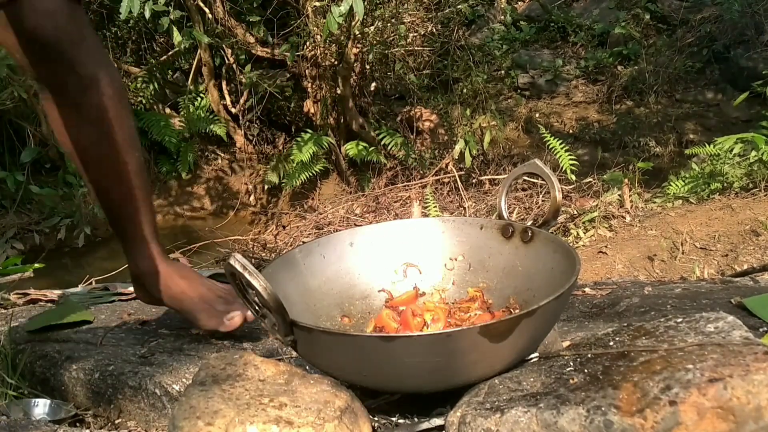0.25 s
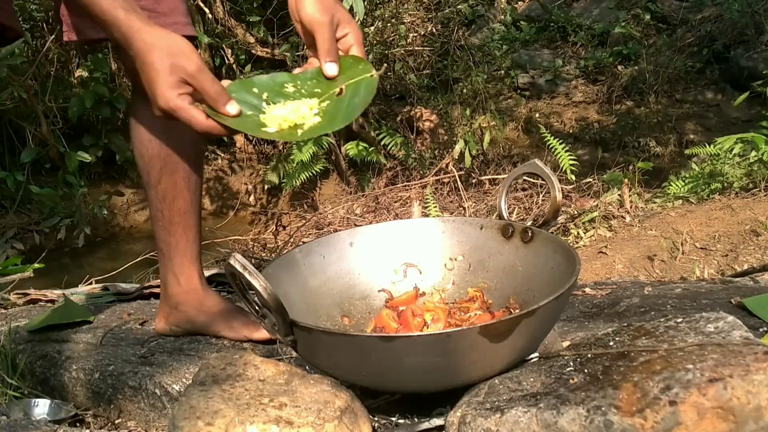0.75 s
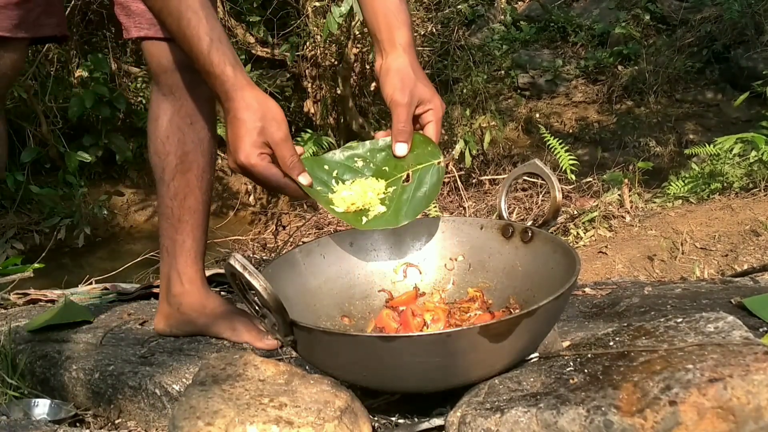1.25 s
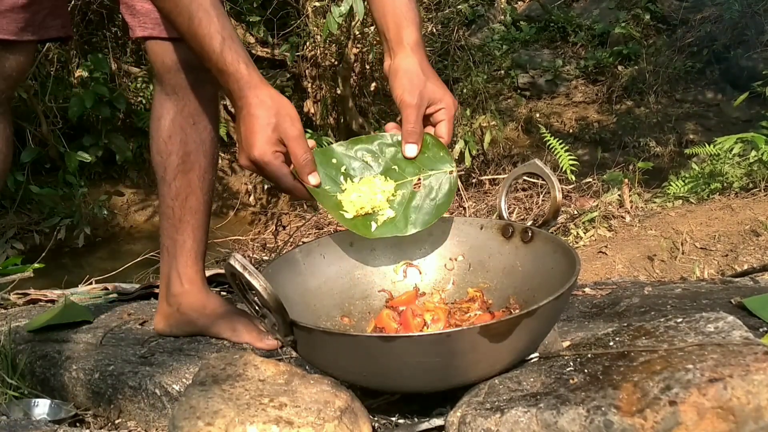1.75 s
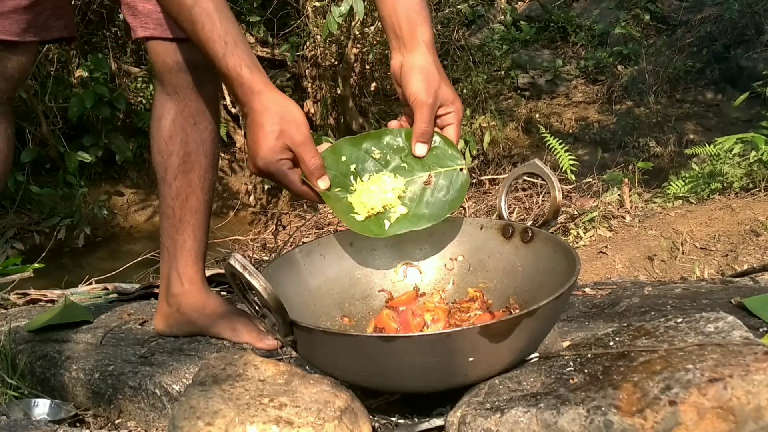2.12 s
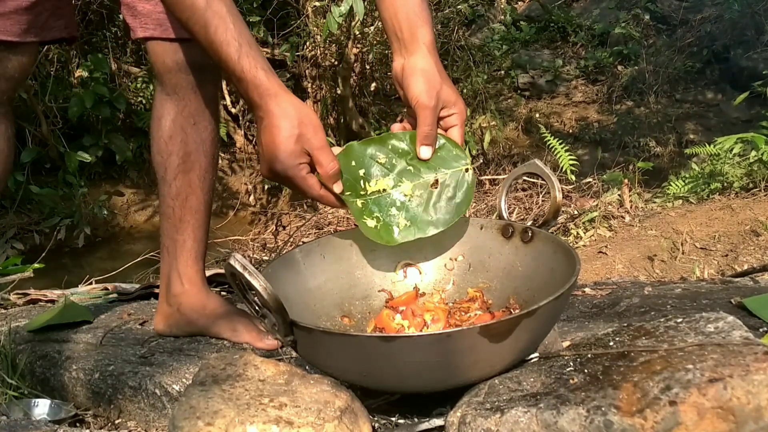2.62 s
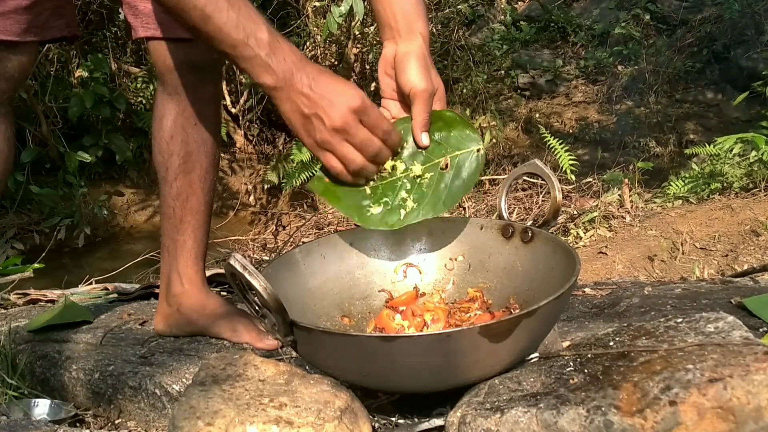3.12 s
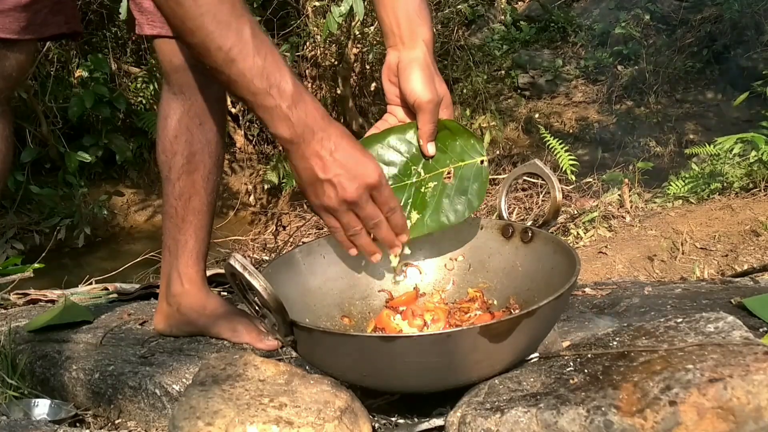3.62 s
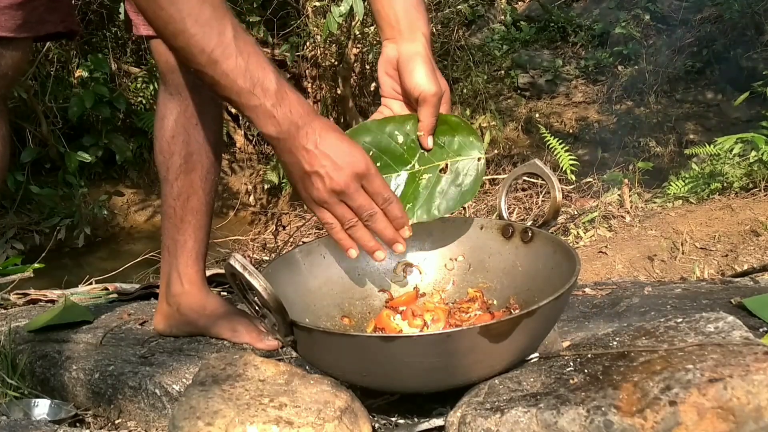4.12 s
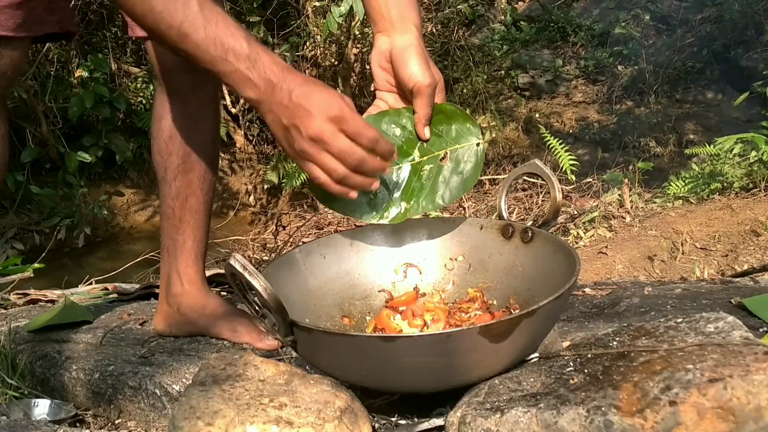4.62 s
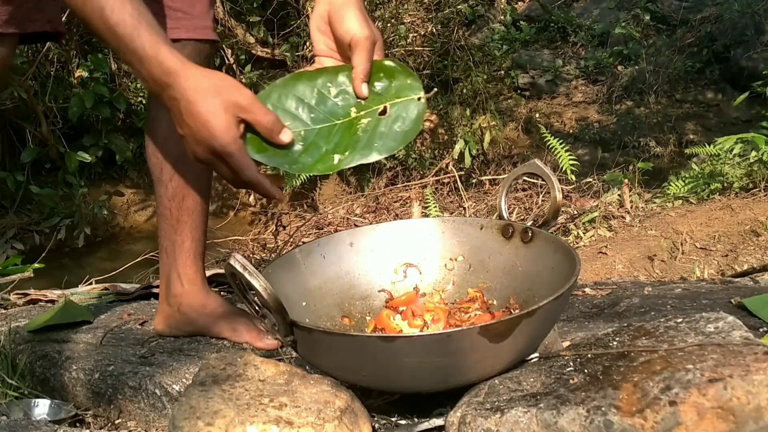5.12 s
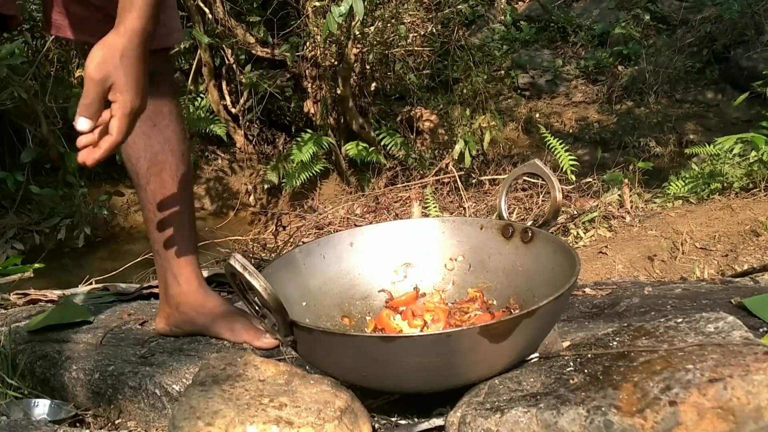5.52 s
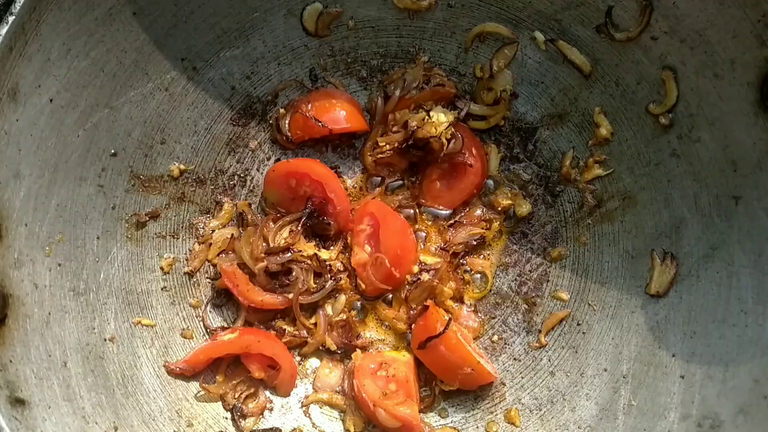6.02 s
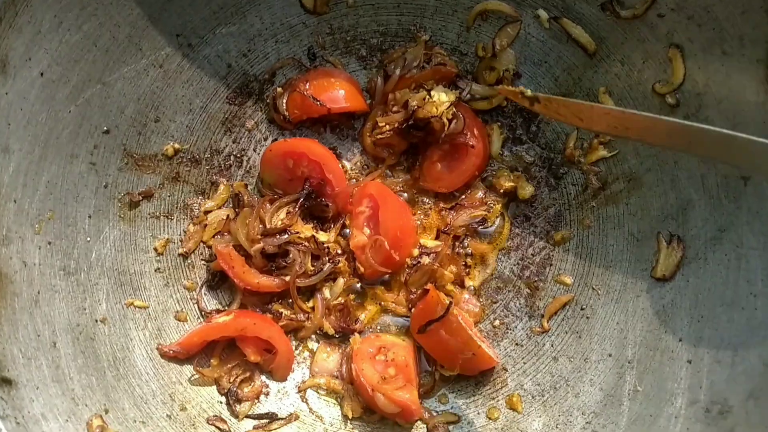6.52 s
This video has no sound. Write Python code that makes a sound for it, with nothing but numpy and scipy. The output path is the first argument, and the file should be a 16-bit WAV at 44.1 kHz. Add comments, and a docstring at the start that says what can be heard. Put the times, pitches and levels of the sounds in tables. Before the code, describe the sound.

Thin, soft frying in the open air with no room echo, heard near for a moment and then from farther off. Small pops and faint twig cracks come first, then a run of dry finger flicks on a leaf, a bright oil snap and a burst of crisp cracks underfoot. At the end, close sizzle swells abruptly with a scraping blade and large drops crackling strongly to the right.

```python
"""Onion and tomato fry in oil in a round metal pan outdoors, heard fairly near, farther off, then over the food.
The sizzle is tiny noise grains over hiss; fat bubbles ring the hollow of the pan, and large drops spit.
Fingers flick garlic off a stiff leaf (strokes of grains, taps of dying noise), twigs snap under a foot
(broad noise puffs), and a knife scrapes the pan (dense grains) as the close sizzle comes in."""
import sys
import numpy as np
from scipy import signal
from scipy.fft import rfft, irfft
from scipy.io import wavfile
from scipy.ndimage import uniform_filter1d

SR = 44100
rng = np.random.default_rng(int(sys.argv[2]) if len(sys.argv) > 2 else 0)


def inscribe(sig):
    """Save sig as 16-bit PCM at rate SR to the path in sys.argv[1].

    A 1-D sig is mono; a 2-D sig holds one channel per row.
    Samples are clipped to [-1, 1] before scaling.
    """
    pcm = np.round(np.clip(np.atleast_2d(sig).T, -1, 1) * 32767)
    wavfile.write(sys.argv[1], SR, pcm.astype(np.int16))


N = 297675

# loudness of the sizzle heard from farther off, which the bubbles follow too: [t/s, level/dB]
FAR_LEVEL = [(0.47, -58), (0.9, -60), (1.9, -62), (2.5, -61), (4.8, -60.5), (5.98, -60), (6.2, -64)]


def amp(db):
    """Turns decibels into a gain."""
    return 10 ** (np.asarray(db) / 20)


def evened(x):
    """Scales a sound to an average (rms) strength of 1."""
    return x / np.sqrt(np.mean(x ** 2) + 1e-20)


def read(points, hz):
    """Reads a table between its rows, with pitch on a log scale."""
    f, value = np.transpose(points)
    return np.interp(np.log(hz + 1), np.log(f + 1), value)


def add(mix, start_s, sound):
    """Adds a stereo sound to the mix from a given second, cut at the end of the mix."""
    part = mix[:, round(start_s * SR):][:, :sound.shape[1]]
    part += sound[:, :part.shape[1]]


def sides(balance_db):
    """Left and right gains that differ by balance_db (left minus right)."""
    return amp(np.array([balance_db / 2, -balance_db / 2]))


def pair(hz, own, shared, extra):
    """Left and right spectra: partly the same noise, as one source reaches both microphones."""
    # how alike left and right are, before extra is added: [f/Hz, likeness/0 to 1]
    likeness = [(30, .3), (70, 0.65), (130, 0.9), (290, 0.96), (640, 0.85), (1100, 0.55), (1800, 0.62),
                (3100, 0.16), (6800, 0.08), (15000, 0.21)]
    # how far the left microphone leads in phase: [f/Hz, lead/rad]
    left_lead = [(300, 0.16), (1000, 0.83), (1400, 1.02), (1800, 2), (2400, 1.2)]
    same = np.clip(read(likeness, hz) + extra, 0, 1)
    turned = np.exp(1j * read(left_lead, hz)) * shared
    left = same * turned + np.sqrt(1 - same ** 2) * own
    return np.array([left, shared])


def grains(length, per_s, spread_db, grain_s):
    """Random clicks, mostly small, a few large, each open a dying puff of noise with its own colour."""
    size = amp(spread_db * np.minimum(rng.exponential(1, (2, length)), 5))
    clicks = size * (rng.random((2, length)) < per_s / SR)
    dying = np.exp(-1 / (grain_s * SR))
    envelope = signal.lfilter([1], [1, -dying], clicks)
    return evened(envelope * rng.standard_normal((2, length)))


def texture(rows, colour, balance, per_s, spread_db, grain_s, hiss, patchy_db):
    """Grains over hiss, with drifting patches of pitch, under a level curve; hiss is its share of power."""
    s, level_db = np.transpose(rows)
    t = np.arange(s[0], s[-1], 1 / SR)
    length = len(t) + 1024
    drive = np.sqrt(1 - hiss) * grains(length, per_s, spread_db, grain_s)
    drive += np.sqrt(hiss) * rng.standard_normal((2, length))
    hz, _, (own, shared) = signal.stft(drive, SR, nperseg=1024, noverlap=768)

    # smoothing over pitch, then over time, makes the patches
    patches = uniform_filter1d(rng.standard_normal(own.shape), size=12, axis=0)
    patches = evened(uniform_filter1d(patches, size=6, axis=1))
    z = pair(hz[:, None], own, shared, extra=0)
    z = z * sides(read(balance, hz))[:, :, None]
    z = z * amp(read(colour, hz)[:, None] + patchy_db * patches)
    out = signal.istft(z, SR, nperseg=1024, noverlap=768)[1][:, 512:512 + len(t)]

    # 8 ms fades, unless the sound touches the start or end of the scene
    touches = (s[0] == 0) + (s[-1] > N / SR - .01)
    fade = np.minimum(1, np.minimum(t - s[0], s[-1] - t) / .008 + touches)
    middle_rms = np.sqrt(np.mean(out.mean(0) ** 2))
    return s[0], out / middle_rms * amp(np.interp(t, s, level_db)) * fade


def burst(hz, gain, t60, rise_s, balance_db):
    """A blow's dying puff of noise with the spectrum gain; t60 is the time to die by 60 dB."""
    t = np.arange(4096) / SR
    z = rfft(rng.standard_normal((2, 4096)))
    # single events are more alike left and right
    puff = irfft(pair(hz, z[0], z[1], extra=0.14) * gain)
    shape = amp(-60 * t / t60) * (1 - np.exp(-t / rise_s))
    # the first instant of a blow stands out over its ring
    spike, spike_s = 2, 0.0011
    shape *= 1 + spike * np.exp(-t / (spike_s + rise_s))
    puff = puff * shape
    return puff / abs(puff).max(1)[:, None] * sides(balance_db)[:, None]


def knocks(mix, rows, width, t60, damping):
    """Puffs around each pitch: low ones swell and die more slowly; width is a share of the pitch."""
    # which side a knock leans to: [f/Hz, left minus right/dB]
    knock_balance = [(300, -4.5), (1500, -7), (6500, -10.5)]
    hz = np.fft.rfftfreq(4096, 1 / SR)
    for s, db, centre_hz in rows:
        gain = 1 / (1 + ((hz / centre_hz - 1) / width) ** 4)
        ring_s = t60 * (centre_hz / 1000) ** -damping
        balance_db = read(knock_balance, centre_hz)
        add(mix, s, amp(db) * burst(hz, gain, ring_s, 2.3 / centre_hz, balance_db))


def near_sizzle(mix):
    """Sizzle heard fairly near: many very short grains of noise over strong hiss."""
    # loudness: [t/s, level/dB]
    near_level = [(0.0, -47), (0.395, -47), (0.415, -52.5), (0.47, -51.5), (0.49, -70)]
    # strength at each pitch: [f/Hz, level per Hz/dB]
    near_colour = [(24, -66), (40, -26), (114, -8), (333, -11), (397, 0), (548, -9.5), (1450, -2.5),
                   (1770, -5.5), (2110, -3), (4460, -5), (6810, -1.5), (9180, -3), (10100, -18.5),
                   (11500, -11.5), (15500, -17)]
    # side at each pitch: [f/Hz, left minus right/dB]
    near_balance = [(60, -2.0), (110, 2), (200, -6), (380, -5), (700, 2), (1290, -10.5), (2380, -2),
                    (4400, -13), (8120, -11.0), (15000, 1)]
    add(mix, *texture(near_level, near_colour, near_balance,
                      per_s=1400, spread_db=4.1, grain_s=0.00025, hiss=0.79, patchy_db=1.6))


def bubbles(mix):
    """Fat bubbles ring the hollow of the pan, following the level of the far sizzle."""
    # ringing tones of the hollow pan: [f/Hz, width/Hz, relative level/dB]
    bowl_tones = [(390, 48, -3.5), (850, 50, -3.5), (1540, 110, -4.5), (2100, 180, -2)]
    t, out = np.arange(3000) / SR, np.zeros((2, N))
    for hz, width, db in bowl_tones:
        ring = np.exp(-np.pi * width * t) * np.sin(2 * np.pi * hz * t)
        drive = grains(N, per_s=90, spread_db=3.6, grain_s=0.0092)[0]
        tone = evened(signal.oaconvolve(drive, ring)[:N])
        out += amp(db) * tone * sides(-10.5)[:, None]
    s, level_db = np.transpose(FAR_LEVEL)
    mix += out * amp(np.interp(np.arange(N) / SR, s, level_db) - 13.5)


def snaps(mix):
    """Knocks, pings and spits of oil: narrow puffs of noise, so each has a pitch."""
    # each event: [t/s, peak level/dB, f/Hz]
    snap_events = [(0.045, -36, 6300), (0.059, -33, 6300), (.15, -46.5, 890), (.2625, -34.5, 6240),
                   (.395, -51, 406), (.444, -40, 1280), (.447, -46, 630), (0.453, -42, 1300),
                   (.755, -49.5, 945), (1.555, -56.5, 725), (2.23, -58, 850), (2.465, -55, 940),
                   (2.55, -58, 380), (2.835, -50, 874), (3.585, -50.5, 1690), (3.588, -47.5, 390),
                   (4.344, -52, 1900), (5.1958, -28, 6800), (5.772, -37, 1670), (5.933, -36, 6300),
                   (5.942, -42.5, 5330)]
    # ring time in seconds is for 1 kHz
    knocks(mix, snap_events, width=0.21, t60=0.081, damping=0.42)


def cracks(mix):
    """Twigs and dry leaves crack underfoot: broad puffs of noise with hardly any pitch."""
    # each crack, the big snap in low, middle and high parts: [t/s, peak level/dB, centre f/Hz]
    crack_events = [(.436, -37, 1020), (1.628, -45.5, 2100), (1.775, -49.5, 2984), (2.64, -58.5, 350),
                    (5.727, -22, 2250), (5.727, -38.5, 297), (5.7274, -22.5, 5960), (5.7276, -39, 11500),
                    (5.738, -34, 2800), (5.742, -43, 298), (5.776, -41, 3500), (5.77, -36, 3940),
                    (5.793, -35, 5700), (5.799, -43, 4000), (5.794, -30.5, 2298), (5.885, -46.5, 5000)]
    # ring time in seconds is for 1 kHz
    knocks(mix, crack_events, width=0.58, t60=0.088, damping=0.14)


def far_sizzle(mix):
    """Sizzle heard from farther off: fewer, longer grains over hiss."""
    # strength at each pitch: [f/Hz, level per Hz/dB]
    far_colour = [(24, -14), (60, -22.5), (154, -6), (320, -15), (385, -5.5), (600, -8.5), (838, -8.5),
                  (1020, -7.5), (1300, -3.5), (1750, -9), (2060, -5), (4400, -7), (6500, -4.5), (9300, -7),
                  (9900, -21), (12000, -13.5), (15500, -19.5)]
    # side at each pitch: [f/Hz, left minus right/dB]
    far_balance = [(60, 10), (110, 5), (200, -6.5), (380, 1), (700, 0.5), (1290, -7), (2380, -3.5),
                   (4400, -10), (8120, -9.5), (15000, 3)]
    add(mix, *texture(FAR_LEVEL, far_colour, far_balance,
                      per_s=1000, spread_db=4.3, grain_s=0.0011, hiss=0.76, patchy_db=2.0))


def leaf_strokes(mix):
    """Fingers brush the stiff leaf: rubbing grains swell, hold and fall away."""
    # each stroke: [full contact t/s, held time/s, level/dB]
    strokes = [(3.21, 0.057, -57), (3.462, .028, -48), (3.704, 0.0054, -46), (3.918, 0.017, -50),
               (4.15, 0.035, -50.5), (4.373, 0.018, -55), (4.59, .006, -54.5), (4.808, 0.042, -49),
               (5.022, .012, -50.5)]
    # strength at each pitch: [f/Hz, level per Hz/dB]
    leaf_colour = [(29, -58), (50, -31), (187, 1.5), (466, 1.5), (637, -8), (849, -1), (935, -16),
                   (1130, 2), (1880, -9), (2270, -4.5), (2890, -8), (7540, -9.5), (15500, -39)]
    # side at each pitch: [f/Hz, left minus right/dB]
    leaf_balance = [(60, 16), (180, -6), (550, 0), (1650, -11), (4970, -10), (15000, -11)]
    rise_s, rise_db, fall_s, fall_db = .028, -33, .05, -23.5
    for s, held, db in strokes:
        let_go = s + held
        rows = [(s - rise_s, db + rise_db), (s, db), (let_go, db), (let_go + fall_s, db + fall_db)]
        add(mix, *texture(rows, leaf_colour, leaf_balance,
                          per_s=600, spread_db=2.6, grain_s=0.0012, hiss=0.39, patchy_db=2.14))


def leaf_taps(mix):
    """Fingertips land on the leaf: short puffs of noise, some duller and some brighter."""
    # each tap: [t/s, peak level/dB, brightness/dB per octave]
    taps = [(3.214, -42, -4), (3.251, -40, 8), (3.456, -38.5, -3.5), (3.465, -36, 4), (3.484, -36.5, -3.5),
            (3.688, -41.5, -5.5), (3.708, -31.5, -1.6), (3.717, -36, 0.1), (3.742, -49, -8.5),
            (3.912, -43, -1), (3.921, -37, 0), (3.929, -35.5, -2), (4.147, -40, 5.5), (4.174, -41.5, 2.4),
            (4.587, -39.5, -11.5), (4.595, -42.5, -5), (4.619, -46, -7), (4.808, -27, -2),
            (4.823, -36, -1.5), (4.839, -34.5, -3), (5.017, -31, -3.5), (5.026, -35.5, -4.5),
            (5.051, -40, -6)]
    # the leaf under a tap is duller than under a stroke: [f/Hz, level per Hz/dB]
    tap_colour = [(40, -33), (100, -22), (190, -1), (420, -2.5), (650, -14.5), (1200, 4), (1800, -2.5),
                  (2300, 2), (2900, -12.5), (6000, -17), (15500, -36)]
    hz = np.fft.rfftfreq(4096, 1 / SR)
    for s, db, tilt_db in taps:
        # the tilt turns around about 1 kHz; the .05 limits it in the bass
        tilt = tilt_db * np.log2(hz / 1000 + .05)
        gain = amp(read(tap_colour, hz) + tilt)
        add(mix, s, amp(db) * burst(hz, gain, t60=0.038, rise_s=0.004, balance_db=-3.5))


def close_fizz(mix):
    """Sizzle right over the food: bright grains, far stronger on the right."""
    # loudness: [t/s, level/dB]
    close_level = [(6.15, -83), (6.18, -49), (6.27, -32), (6.39, -30.5), (6.75, -30.5)]
    # strength at each pitch: [f/Hz, level per Hz/dB]
    close_colour = [(2500, -27), (3850, -28), (4080, -5), (5000, -3), (5600, -0.5), (6500, -3.5),
                    (7800, -6.5), (8400, -13.5), (11000, -21), (15500, -28)]
    # side at each pitch: [f/Hz, left minus right/dB]
    close_balance = [(3000, -24), (6000, -24), (12000, -26.5)]
    add(mix, *texture(close_level, close_colour, close_balance,
                      per_s=1200, spread_db=2.8, grain_s=0.00079, hiss=0.47, patchy_db=1.6))


def frying_wash(mix):
    """Broad frying wash under the close fizz: dense, uneven grains over hiss."""
    # loudness: [t/s, level/dB]
    wash_level = [(6.15, -83), (6.182, -52), (6.232, -43), (6.362, -42), (6.6, -47.5), (6.75, -47.5)]
    # strength at each pitch: [f/Hz, level per Hz/dB]
    wash_colour = [(40, -1), (90, -8.5), (300, -8), (550, -3.5), (900, -8), (1300, 0), (2500, 0), (3300, 1),
                   (3800, 1), (5000, -3.5), (8000, -21), (9000, -8.5), (15500, -19)]
    # side at each pitch: [f/Hz, left minus right/dB]
    wash_balance = [(60, 3), (200, -1.5), (700, -6.5), (1300, -10), (2400, -6), (4000, -3.5), (8000, -4),
                    (9000, -4), (15000, -7)]
    add(mix, *texture(wash_level, wash_colour, wash_balance,
                      per_s=1500, spread_db=5.2, grain_s=0.00051, hiss=0.72, patchy_db=1.8))


def knife_scrape(mix):
    """A knife scrapes the pan: dense grains of much the same size, one for each tiny catch of the edge."""
    # loudness: [t/s, level/dB]
    scrape_level = [(6.15, -83), (6.18, -46), (6.22, -37.5), (6.32, -36), (6.43, -55)]
    # strength at each pitch: [f/Hz, level per Hz/dB]
    scrape_colour = [(88, -59), (150, -27), (314, -7), (1200, -6), (2180, -1.5), (3160, 0), (7270, 0.5),
                     (9360, -14), (10100, -7.5), (15500, -6.5)]
    # side at each pitch: [f/Hz, left minus right/dB]
    scrape_balance = [(300, -0.92), (2000, 1.6), (6000, 1.45), (12000, 0.32)]
    add(mix, *texture(scrape_level, scrape_colour, scrape_balance,
                      per_s=1500, spread_db=1.9, grain_s=0.00071, hiss=0.45, patchy_db=0.85))


def spits(mix):
    """Large drops burst in the close oil: each is a few cycles of fizz, its pitch scattered at random."""
    # each drop: [t/s, peak level on the right/dB]
    drops = [(6.274, -13.5), (6.286, -15), (6.3283, -12.5), (6.3484, -9), (6.3583, -17), (6.4167, -9.5),
             (6.4344, -12), (6.453, -9.5), (6.4645, -8.5), (6.4892, -7), (6.525, -10.5), (6.5353, -13),
             (6.5453, -18), (6.571, -10), (6.5824, -15), (6.6775, -11.0), (6.7088, -14), (6.7125, -11)]
    t = np.arange(-60, 60) / SR
    # quicker rise than fall, in seconds
    shape = np.exp(-(t / np.where(t < 0, .00025, .0005)) ** 2)
    for s, db in drops:
        hz = 5900 * (1 + .06 * rng.standard_normal())
        grain = np.cos(2 * np.pi * hz * t) * shape
        # the right is the near side; the left is 26 dB weaker
        add(mix, s + t[0], amp(db + np.array([[-26.], [0]])) * grain)


def scene():
    """All sources in the open air, with no room."""
    mix = np.zeros((2, N))
    near_sizzle(mix)
    bubbles(mix)
    snaps(mix)
    cracks(mix)
    far_sizzle(mix)
    leaf_strokes(mix)
    leaf_taps(mix)
    close_fizz(mix)
    frying_wash(mix)
    knife_scrape(mix)
    spits(mix)
    return mix


def record(dry):
    """The microphones cut the deep bass; then a steep filter removes the top treble."""
    bass_cut_hz, top_hz = 135, 15600
    bass_cut = signal.butter(2, bass_cut_hz, "high", fs=SR, output="sos")
    thin = signal.sosfilt(bass_cut, dry)
    treble_cut = signal.firwin(511, top_hz, window=("kaiser", 11), fs=SR)
    return signal.oaconvolve(thin, treble_cut[None], "same")


dry = scene()
out = record(dry)
inscribe(out)
```